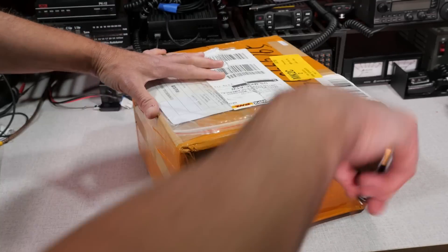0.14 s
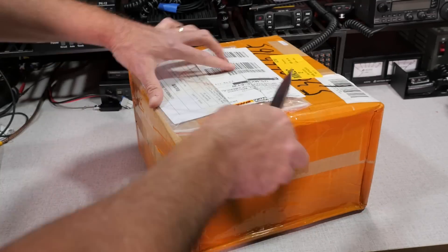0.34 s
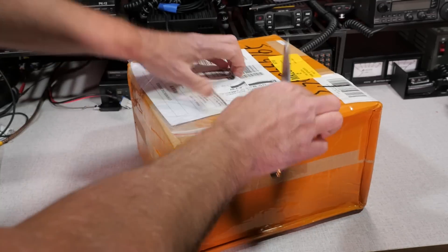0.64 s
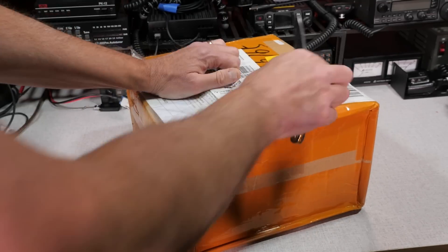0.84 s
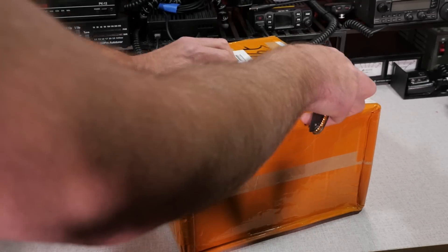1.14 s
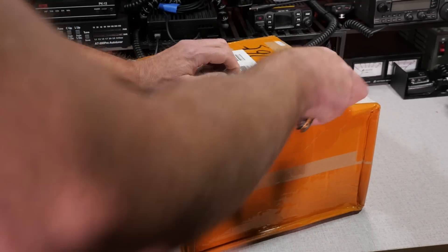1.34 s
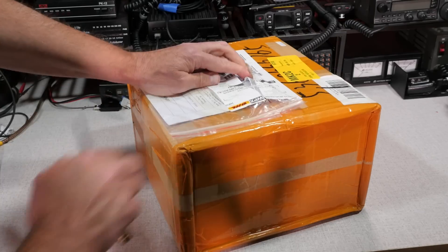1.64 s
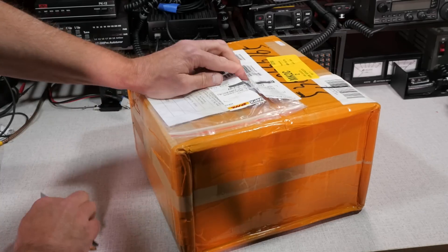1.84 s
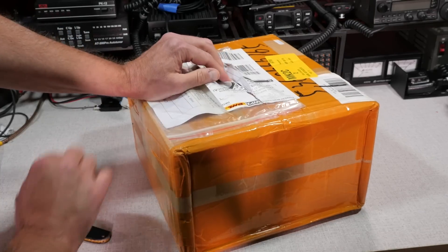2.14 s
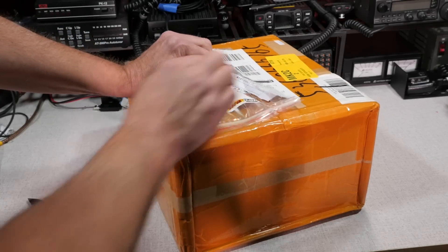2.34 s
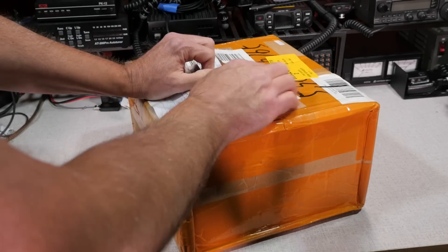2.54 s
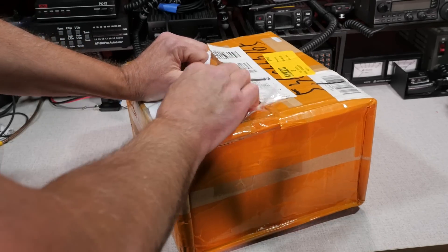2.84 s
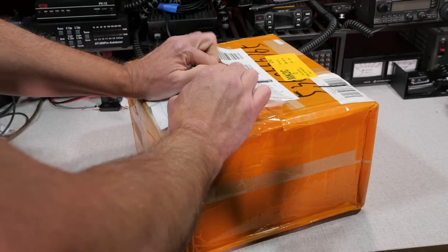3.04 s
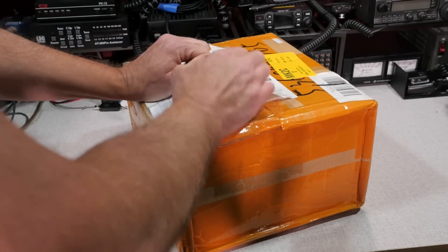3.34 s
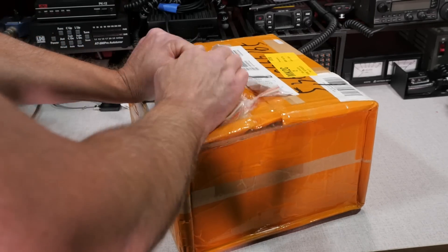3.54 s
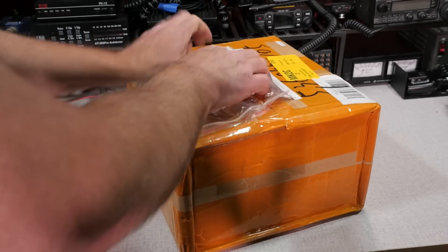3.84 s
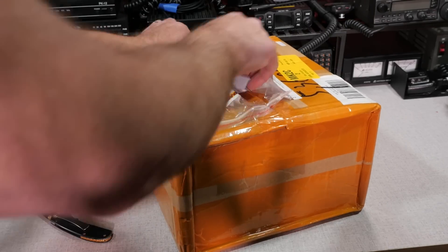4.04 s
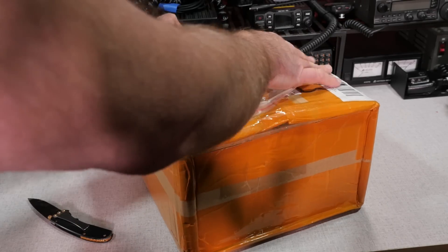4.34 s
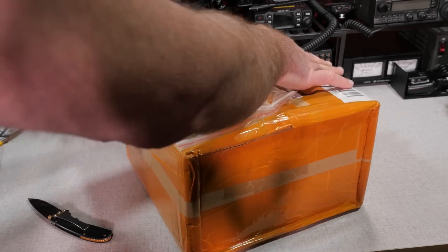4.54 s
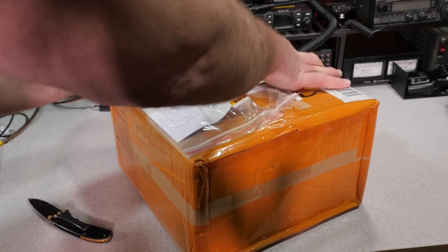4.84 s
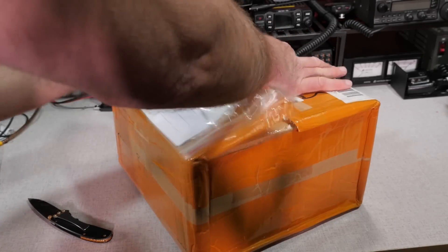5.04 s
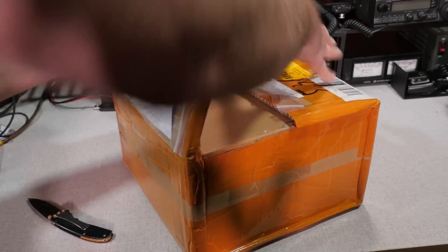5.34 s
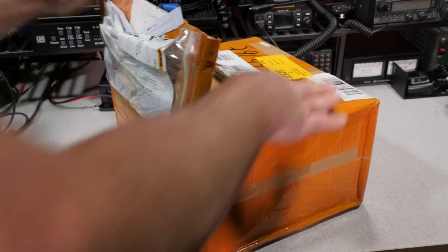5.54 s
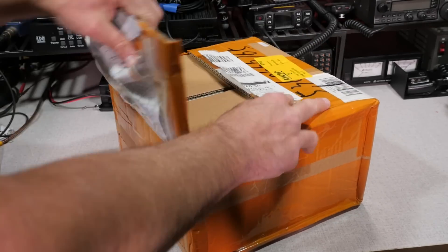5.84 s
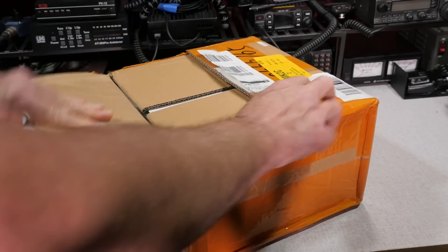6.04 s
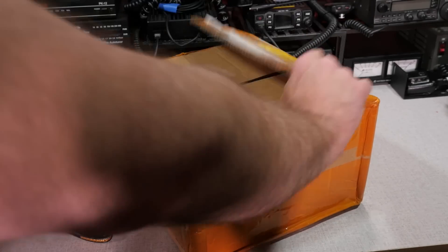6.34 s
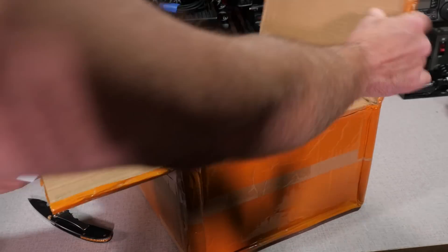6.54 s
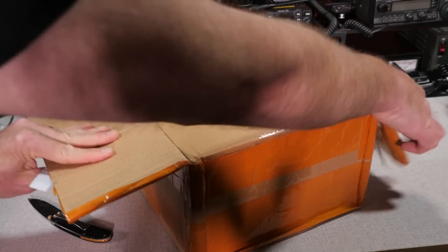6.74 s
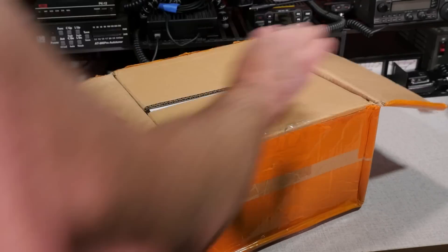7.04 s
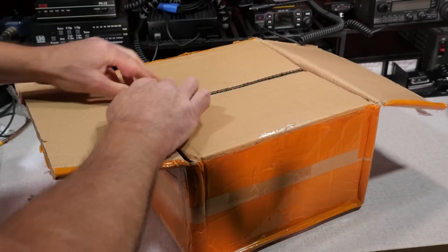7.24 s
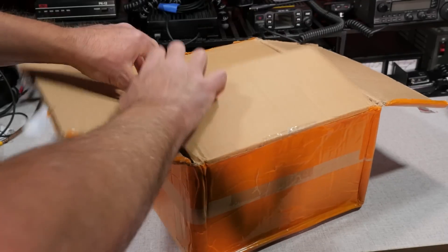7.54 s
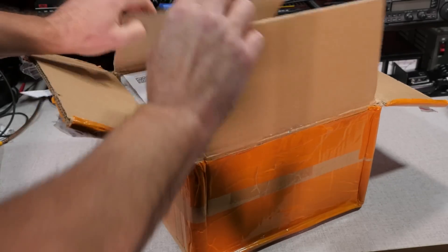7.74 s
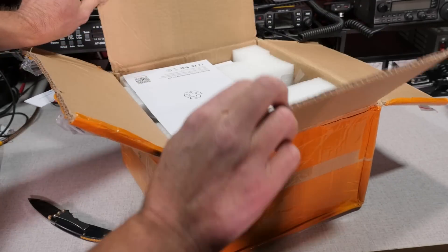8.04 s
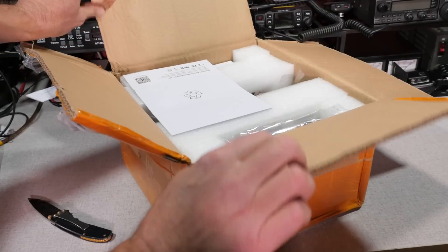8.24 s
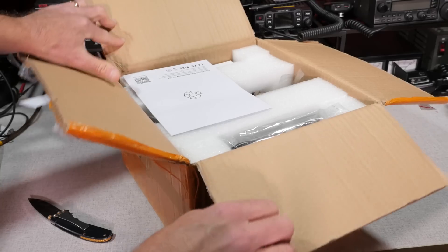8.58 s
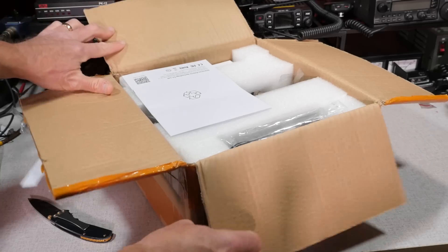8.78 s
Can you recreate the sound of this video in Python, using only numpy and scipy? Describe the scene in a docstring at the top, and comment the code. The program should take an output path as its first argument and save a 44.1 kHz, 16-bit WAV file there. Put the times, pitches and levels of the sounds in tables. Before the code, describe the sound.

A small, dry room with constant soft fan noise and faint wavering mains hum. At once, a sharp snap and hollow cardboard knock; around 0.8 s another crinkly crack with a box thud, then lighter film rustles and a knock at 1.6 s. At 2.1-2.3 s a short, coarse, drumming rip of the glued pouch. From 2.6 to 4 s plastic crinkles densely with bright tape snaps, the sharpest cluster near 3.5-3.6 s. Quieter crackles and ticks follow until about 4.9 s, when pressure builds into the loudest crack and hollow double thump at 5.05-5.1 s. Film rustle fades by 5.6 s and card flaps slide with a fine dry hiss. A sharp fold crack at 6.4 s, a tiny sagging creak at 6.7 s, soft scrapes, a bump at 7.5 s, then gentle flap slides to about 9 s.

```python
"""A small, dry room: a taped cardboard parcel is opened by hand on a desk, over equipment fans and a mains hum.
The plastic pouch on its lid rips and crinkles, tape snaps, the box knocks, and the flaps slide and crack at a fold.
Noise bursts make the snaps, random slips the friction and rip, damped sines the knocks, a sagging tone the creak.
Filters shape them as film, card and box; filtered noise and wavering sines make the equipment."""
import sys
import numpy as np
from scipy import signal
from scipy.fft import rfft, irfft
from scipy.io import wavfile
from scipy.ndimage import uniform_filter1d

SR = 44100
rng = np.random.default_rng(int(sys.argv[2]) if len(sys.argv) > 2 else 0)


def dump(signal):
    """Clip the signal to [-1, 1] and save it as 16-bit WAV at the path in sys.argv[1]."""
    limited = np.clip(np.atleast_2d(signal).T, -1, 1)
    pcm = np.round(limited * 32767).astype(np.int16)
    wavfile.write(sys.argv[1], SR, pcm)


N = 392921
TIME = np.arange(N) / SR
LEFT_RIGHT = np.array([[1], [-1]])


def undb(db):
    """Decibels to gain."""
    return 10 ** (np.asarray(db) / 20)


def unit(x):
    """Scale to rms 1."""
    return x / np.sqrt(np.mean(x ** 2))


def unit_peak(x, size=176):
    """Scale so that the loudest `size` samples have rms 1."""
    power = np.mean(np.atleast_2d(x) ** 2, axis=0)
    return x / np.sqrt(uniform_filter1d(power, size).max())


def add(out, sound, start_s):
    """Mix a sound in at a time."""
    start = max(int(start_s * SR), 0)
    out[..., start:start + sound.shape[-1]] += sound[..., :N - start]


def through(x, response):
    """Pass one or two channels through an impulse response."""
    return signal.oaconvolve(np.atleast_2d(x), np.atleast_2d(response), axes=1)[:, :x.shape[-1]]


def band(x, hz, kind, order=2):
    """Butterworth filter."""
    return signal.sosfilt(signal.butter(order, hz, kind, fs=SR, output="sos"), x)


def resonate(x, hz, q):
    """One resonance with gain 1 at its centre."""
    return signal.lfilter(*signal.iirpeak(hz, q, fs=SR), x)


def colour(points, size=512):
    """Causal (minimum-phase) impulse response with the given spectrum."""
    hz, db = np.transpose(points)
    bin_hz = np.maximum(np.arange(size // 2 + 1) * SR / size, 1)
    gain = undb(np.interp(np.log(bin_hz), np.log(hz), db))
    cepstrum = irfft(np.log(gain))
    cepstrum[1:size // 2] *= 2
    cepstrum[size // 2 + 1:] = 0
    return irfft(np.exp(rfft(cepstrum)))


def spread(mid, side, width, corner_hz=750):
    """Two channels that share the bass and differ in the treble."""
    return mid + width * band(side, corner_hz, "high") * LEFT_RIGHT


def walk(rate_hz):
    """Smooth random wandering with a spread near 1."""
    k = int(SR / rate_hz)
    steps = np.repeat(rng.standard_normal(N // k + 1), k)
    return 1.38 * uniform_filter1d(uniform_filter1d(steps, k), k)[:N]


def swell(start_s, rise_s, fade_s):
    """A straight rise, then an exponential fade."""
    t = TIME - start_s
    return np.clip(t / rise_s, 0, 1) * np.exp(-np.clip((t - rise_s) / fade_s, 0, 60))


def stroke(start_s, length_s, roundness):
    """A push that swells and dies away again; the rounder, the gentler its ends."""
    phase = (TIME - start_s) / length_s
    during, out = (phase > 0) & (phase < 1), np.zeros(N)
    out[during] = np.sin(np.pi * phase[during]) ** roundness
    return out


def grains(rate_hz, scatter_db, width):
    """Tiny slips at random moments and places, most weak and a few strong."""
    size = undb(scatter_db * np.minimum(rng.exponential(size=N), 4))
    slips = (rng.random(N) < rate_hz / SR) * size * rng.choice([-1, 1], N)
    return spread(slips, slips * rng.standard_normal(N), width)


# box resonances: (frequency [Hz], bandwidth [Hz], weight [dB])
BOX_MODES = [(159.4, 38, -3.5), (271.5, 32, -2), (374, 87, -1), (445, 81, 1), (600, 171, -1),
             (759, 88, -2.5), (843, 122, -3), (1035, 82, 1), (1063, 56, 1), (1270, 70, -8),
             (1830, 260, -3.5), (1917, 79, -0.5), (2340, 78, -1), (2540, 130, -5)]


def box_ring(lowest_hz=130, size=2048):
    """The box's answer to a tap: damped modes of alternating sign, kept above a lowest frequency."""
    t = np.arange(size) / SR
    out = np.zeros(size)
    for k, (hz, width_hz, db) in enumerate(BOX_MODES):
        decay = np.exp(-np.pi * width_hz * t)
        out += (-1) ** k * undb(db) * width_hz * decay * np.cos(2 * np.pi * hz * t)
    return band(out, lowest_hz, "high")


# fan spectrum: (frequency [Hz], level [dB])
FAN_SPECTRUM = [(25, -15), (45, -24), (75, -11.5), (110, -10.5), (170, 2.5), (300, 6.5), (550, 0.5),
                (900, -2), (1300, -6), (2200, -12.5), (4000, -17), (7800, -20.5), (11300, -13),
                (16000, -30)]
# mains and blade tones: (frequency [Hz], rms level before hum_db [dB])
HUM_TONES = [(118, -58), (237.8, -59), (812, -63), (880, -63.5), (698, -65.5), (974, -66), (1152, -66.5)]


def equipment(fan_db=-48, hum_db=-1, waver_db=1.5):
    """Steady fan noise with slightly wavering mains and blade tones."""
    noise = spread(*rng.standard_normal((2, N)), width=0.77)
    air = through(noise, colour(FAN_SPECTRUM, size=8192))
    tones = np.zeros(N)
    for hz, db in HUM_TONES:
        level = undb(db + waver_db * walk(3.46)) * np.sqrt(2)
        tones += level * np.sin(2 * np.pi * hz * TIME + 0.5 * walk(3.3))
    return undb(fan_db) * unit(air) + undb(hum_db) * tones


def room(x, t60_s=0.17, wet_db=-9.0, delay_s=0.005, size=16384):
    """Close walls and shelves give a short, dense tail of decaying noise."""
    t = np.arange(size) / SR
    diffuse = spread(*rng.standard_normal((2, size)), width=0.68)
    tail = diffuse * (t > delay_s) * np.exp(-np.log(1000) * t / t60_s)
    return x + undb(wet_db) * through(x, unit(tail) / np.sqrt(size))


CREAK_S, CREAK_LENGTH_S, CREAK_HZ, CREAK_DB, CREAK_SAG_HZ_PER_S = 6.736, 0.027, 468, -26, 700


def creak(overtone_db=-17):
    """A flap's fold sticks and slips: a short, nearly pure tone whose pitch sags as it lets go."""
    hz = CREAK_HZ - CREAK_SAG_HZ_PER_S * np.clip(TIME - CREAK_S, 0, CREAK_LENGTH_S)
    phase = 2 * np.pi * np.cumsum(hz * (1 + 0.0205 * walk(160))) / SR
    overtones = sum(np.sin(k * phase) / np.sqrt(k) for k in (2, 3, 4))
    tone = np.sin(phase) + undb(overtone_db) * overtones
    return unit(tone) * undb(CREAK_DB) * stroke(CREAK_S, CREAK_LENGTH_S, roundness=1.9)


# fingers and card edges on card: (middle [s], half length to 1/e [s], level [dB], pitch [Hz])
SCRAPES = [(1.976, .022, -40.5, 870), (1.978, 0.017, -41, 2870), (4.959, 0.021, -28.5, 2260),
           (5.364, 0.014, -40, 1620), (5.66, 0.022, -39, 9000), (5.843, 0.02, -30.5, 2070),
           (6.321, 0.034, -39.5, 930), (6.337, 0.011, -32, 10200), (6.759, 0.0067, -40, 1490),
           (7.035, 0.028, -45.5, 630), (7.217, 0.013, -38.5, 510), (7.712, 0.034, -43.5, 1320)]


def scrapes(q=1.07):
    """An edge judders across card, swelling and fading in one broad resonance."""
    slips = grains(rate_hz=900, scatter_db=1.5, width=0.52)
    out = np.zeros((2, N))
    for middle_s, half_s, db, hz in SCRAPES:
        near = np.abs(TIME - middle_s) < 3 * half_s
        press = np.exp(-((TIME[near] - middle_s) / half_s) ** 2)
        rasp = resonate(resonate(slips[:, near], hz, q), hz, q)
        out[:, near] += undb(db) * press * unit(rasp)
    return out


def wall_swing(hz, t60_s, rise_s=0.00098, size=8192):
    """A cardboard panel swings for a few cycles."""
    t = np.arange(size) / SR
    envelope = (1 - np.exp(-t / rise_s)) * np.exp(-np.log(1000) * t / t60_s)
    return unit_peak(np.sin(2 * np.pi * hz * t) * envelope)


# blows on the walls: (time [s], wall level [dB], wall pitch [Hz], t60 [s], box body above wall [dB])
KNOCKS = [(0.053, -17, 566, 0.081, 2.5), (0.657, -42, 290, 0.071, 7.5), (0.736, -27.5, 324, 0.035, -8),
          (0.804, -18, 305, .06, -2), (1.01, -37.5, 362, 0.12, 4), (1.229, -33.5, 292, 0.05, -7),
          (1.645, -32.5, 263, 0.075, 0.5), (2.31, -38, 403, .11, 6), (2.758, -36, 560, .044, -4),
          (2.993, -38, 640, 0.072, -6), (3.576, -33, 438, .06, 6), (4.524, -43, 376, .06, 3),
          (4.623, -40.5, 406, 0.055, 3), (4.95, -38.5, 650, 0.053, 6), (5.056, -26, 685, 0.04, -1),
          (5.087, -12, 694, 0.039, -12), (5.096, -8, 395, 0.022, -10), (5.526, -37, 350, .044, 0.5),
          (5.96, -39.5, 370, 0.048, 6), (6.372, -26.5, 637, 0.028, -3.5), (7.306, -39.5, 366, .07, -4),
          (7.4, -41, 340, .12, 4), (7.461, -39, 420, 0.046, 0), (7.541, -26, 626, 0.04, -1.5)]
# box bumps on the desk: (time [s], level [dB])
THUDS = [(0.056, -40), (0.811, -29), (4.983, -30), (5.096, -19), (6.999, -39), (7.543, -28)]


def knocks(soft_hz=520, lowest_hz=130, thud_hz=180, thud_t60_s=0.031, contact_s=0.003, size=8192):
    """The struck wall swings and sets the rest of the box going; now and then its base thuds on the desk."""
    out, t = np.zeros((2, N)), np.arange(size) / SR
    body = band(box_ring(), soft_hz, "low", order=3)
    for s, db, hz, t60_s, body_db in KNOCKS:
        blow = rng.standard_normal(size) * np.exp(-t / contact_s)
        rest = unit_peak(through(blow, body))
        add(out, undb(db) * (wall_swing(hz, t60_s) + undb(body_db) * rest), s)
    for s, db in THUDS:
        add(out, undb(db) * wall_swing(thud_hz, thud_t60_s), s)
    return band(out, lowest_hz, "high", order=3)


# crack of snaps, friction, buckling facets and ripping pouch: (frequency [Hz], level [dB])
CRACK_SPECTRUM = [(600, -26), (1200, 7.5), (1800, 5.5), (3300, 7), (4800, 4.5), (6500, 5.5), (10000, -20)]


def friction(crinkle, hiss, drag, hiss_spectrum, coarse):
    """Sparse creases (power share `coarse`) and fine fibres crinkle, hiss and shake the box, pressed unsteadily."""
    coarse = np.clip(coarse, 0, 1)
    creases = unit(grains(rate_hz=380, scatter_db=4.8, width=0.3))
    pressure = undb(2.7 * walk(60))
    box = band(box_ring(), 670, "low")
    parts = (colour(CRACK_SPECTRUM), crinkle), (colour(hiss_spectrum), hiss), (box, drag)
    out = 0
    for response, gain in parts:
        fibres = unit(grains(rate_hz=12000, scatter_db=3, width=0.51))
        slips = (np.sqrt(coarse) * creases + np.sqrt(1 - coarse) * fibres) * pressure
        out = out + gain * unit(through(slips, response))
    return out


# card-on-card hiss: (frequency [Hz], level [dB])
CARD_HISS_SPECTRUM = [(2000, -22), (4500, -2.5), (7000, 1), (8000, -1), (9300, 5.5), (11500, 7),
                      (13500, 1.5), (15000, -2), (16000, -18)]
# flap pushes: (start [s], length [s], push level [dB], box drag above push before drag_db [dB])
SLIDES = [(5.58, 0.46, -39.5, -9), (5.984, 0.26, -46.5, -14), (6.271, 0.16, -40.5, -8),
          (6.41, 0.16, -43, -2), (6.559, 0.23, -38.5, -8), (6.807, 0.053, -38, -1), (6.928, 0.12, -40, -3),
          (7.06, 0.44, -44, -8), (7.158, 0.14, -49, -29), (7.36, 0.1, -51, 6), (7.502, 0.16, -50, 5.5),
          (7.661, .13, -42, -3), (7.818, 0.19, -45, -7), (7.998, 0.12, -50.5, -2), (8.202, 0.26, -45, -13),
          (8.415, 0.28, -44, -6.5), (8.713, 0.26, -48, -3)]


def flaps(roundness=0.51, rasp_db=-9, hiss_db=0, drag_db=-2):
    """Bare card flaps slide over each other with a fine, smooth hiss that swells and fades with each push."""
    force, drag = np.zeros((2, N))
    for s, length_s, db, drag_above_db in SLIDES:
        push = undb(db) * stroke(s, length_s, roundness)
        force, drag = force + push, drag + undb(drag_above_db) * push
    rasp, hiss = undb(rasp_db) * force, undb(hiss_db) * force
    return friction(rasp, hiss, undb(drag_db) * drag, CARD_HISS_SPECTRUM, coarse=0.07)


# film sizzle of the snaps, the buckling facets and the ripping pouch: (frequency [Hz], level [dB])
SIZZLE_SPECTRUM = [(2500, -49.5), (5000, -8), (7000, -4), (7900, -4), (9500, 1), (11500, 0.5),
                   (14000, -6.5), (16000, -16.5)]


def buckles(force, per_s=32, above_db=5, scatter_db=4, low_hz=1100, high_hz=5500, fade_s=0.0026, q=3, size=1024):
    """Small facets of the film pop over at random, each with its own pitch, louder the harder the fingers press."""
    out, t = np.zeros((2, N)), np.arange(size) / SR
    noise = spread(*rng.standard_normal((2, N)), width=0.72)
    noise = through(noise, colour(CRACK_SPECTRUM) + colour(SIZZLE_SPECTRUM))
    facets = 1000
    for when, pitch, strength, chance in rng.random((facets, 4)):
        at = int(when * (N - size))
        if chance < per_s * N / SR / facets:
            burst = noise[:, at:at + size] * np.exp(-t / fade_s)
            pop = resonate(burst, low_hz * (high_hz / low_hz) ** pitch, q)
            gain = undb(above_db + scatter_db * (2 * strength - 2.5))
            add(out, unit_peak(pop) * force[at] * gain, at / SR)
    return out


# film hiss: (frequency [Hz], level [dB])
FILM_HISS_SPECTRUM = [(2000, -27.5), (4500, 1), (7000, 6), (7900, 2.5), (9000, 7), (11000, 8), (13000, 2.5),
                      (15000, 0), (16000, -25)]
# fingers bunching film: (start [s], length [s], grip level [dB], box drag above grip before drag_db [dB])
CRUMPLES = [(0.0, 0.11, -49, 4), (0.234, 0.084, -53, 11), (0.635, 0.18, -49.5, 3), (0.756, 0.12, -38.5, 1),
            (0.949, 0.17, -47.5, 2), (1.129, 0.15, -55, 1), (1.36, .18, -60.5, 0), (1.607, 0.097, -47.5, 4),
            (1.77, 0.14, -63, 0), (1.92, 0.084, -48.5, 7), (2.029, 0.2, -46, 0), (2.34, 0.12, -55, 7),
            (2.525, 0.2, -55, 1), (2.628, 0.15, -46, -11), (2.74, 0.22, -46.5, -22),
            (2.933, 0.23, -43.5, -1.5), (3.268, 0.098, -37, -4.5), (3.4, 0.3, -44.5, -11),
            (3.761, 0.17, -38.5, -10.5), (3.966, 0.18, -49, -7), (4.131, 0.12, -42.5, -4),
            (4.299, .11, -49, 2), (4.479, 0.13, -47.5, -2.5), (4.612, 0.058, -40.5, -3.5),
            (4.714, 0.22, -46.5, 0), (4.925, 0.23, -34, -2), (5.153, 0.19, -47.5, 7.5),
            (5.311, 0.09, -43.5, 5), (5.439, 0.066, -54, -2), (5.507, 0.066, -43.5, -0.5)]


def film(attack_s=0.005, release_s=0.021, arch_db=4.5, crinkle_db=0, hiss_db=0, drag_db=-2, resting_db=-73):
    """Fingers grip, press hardest halfway and let go; the film crinkles in sparse grains and ticks faintly at rest."""
    force, drag = np.full(N, undb(resting_db)), np.zeros(N)
    for s, length_s, db, drag_above_db in CRUMPLES:
        t = np.arange(int((length_s + 6 * release_s) * SR)) / SR
        arch = undb(arch_db * (np.sin(np.pi * np.minimum(t / length_s, 1)) - 1))
        let_go = np.exp(-np.maximum(t - length_s, 0) / release_s)
        grip = arch * np.minimum(t / attack_s, 1) * let_go
        add(force, undb(db) * grip, s)
        add(drag, undb(db + drag_above_db) * grip, s)
    crinkle, hiss = undb(crinkle_db) * force, undb(hiss_db) * force
    rubbing = friction(crinkle, hiss, undb(drag_db) * drag, FILM_HISS_SPECTRUM, coarse=0.46)
    return rubbing + buckles(force)


# tugs on the pouch: (start [s], pull level [dB], film sizzle above pull [dB])
TUGS = [(2.086, -21.5, -14), (2.107, -14.5, -5), (2.147, -19.5, -8), (2.176, -19.5, -26), (2.222, -23, -6),
        (2.251, -30, -8.5)]
TUG_RISE_S, TUG_FADE_S = 0.013, 0.026


def rip(lowest_hz=190, highest_hz=1900, drum_hz=950, drum_db=1, crack_db=1):
    """Tugged glue lets go in dense slips that shake the lid, drum in the taut pouch and crackle in its film."""
    pull, sizzle = np.zeros((2, N))
    for s, db, sizzle_db in TUGS:
        tug = undb(db) * swell(s, TUG_RISE_S, TUG_FADE_S)
        pull, sizzle = np.hypot(pull, tug), np.hypot(sizzle, undb(sizzle_db) * tug)
    slips = grains(rate_hz=1300, scatter_db=1.5, width=0.51)
    lid = unit(band(through(slips, box_ring()), [lowest_hz, highest_hz], "band"))
    drum = unit(resonate(slips, drum_hz, q=3))
    crackle = unit(through(slips, colour(CRACK_SPECTRUM)))
    pouch_film = unit(through(slips, colour(SIZZLE_SPECTRUM))) + undb(crack_db) * crackle
    return band(pull * (lid + undb(drum_db) * drum) + sizzle * pouch_film, 124, "high")


# tape, film and card snapping; part levels are before crack_db, card_db and film_db:
# (time [s], crack level [dB], card ring above crack [dB], film sizzle above crack [dB],
#  sheet pitch [Hz], flutter drive above release [dB])
SNAPS = [(0.0532, -15.5, -3.5, -10, 1840, 3), (0.0573, -15, -27, 4, 2450, -13),
         (0.281, -35, -24, 9, 2960, -6), (0.3322, -38.5, -2, -9, 1850, 21),
         (0.553, -64, -10, 18.5, 4000, -1), (0.654, -47, -8, 12.5, 1500, -12.5),
         (0.7852, -33.5, 1, 1, 2110, 1), (0.8057, -26.5, -25, 1, 1370, -13),
         (0.834, -23.5, -7, 8.5, 4650, -21.5), (0.9105, -25, -9, -2.5, 3320, -17),
         (1.026, -36, -24, -9, 1450, -10), (1.402, -50, 3, 11.5, 3050, -1), (1.6469, -27, -13, 0, 2200, 10),
         (2.046, -42, -9, 3, 4360, -6), (2.075, -31, -10, -5, 5500, -3), (2.093, -21, -15, -1.5, 2340, -2),
         (2.1814, -15.5, 5.5, 1, 1770, -9.5), (2.349, -42.5, -13, 8.5, 3770, -10),
         (2.6675, -26, -12, 5.5, 5400, -12), (2.691, -33.5, -24, 2.5, 4270, -19),
         (2.7513, -34, -4, 17.5, 4900, -13), (2.7634, -21.5, -15, 6, 4000, -12),
         (2.795, -18, -12.5, 6, 3820, -11.5), (2.854, -32.5, -25, 6, 5000, -9),
         (2.933, -31.5, -6, -1.5, 4100, 6), (3.0935, -33.5, -2, 1, 1200, -4),
         (3.105, -27, -24, -2, 1090, -4), (3.2251, -24, -13.5, -2.5, 3040, -10),
         (3.3564, -41, -3.5, 11, 4340, -4), (3.472, -25.5, -7.5, 9, 4000, -9),
         (3.4901, -24.5, -6, 10, 4960, 4), (3.5194, -19, -6, 5.5, 5070, -18),
         (3.5276, -18.5, -26, 3.5, 3950, 5), (3.5642, -8.5, -26, -2.5, 3600, -17.5),
         (3.579, -13.5, -17, -9, 1200, -21), (3.5963, -18, -15, -2.5, 3480, -12),
         (3.7471, -39.5, -10, 12, 4700, -9), (3.8953, -34.5, -11, 2.5, 1440, -8),
         (4.0177, -41, -3, -14, 1220, 8), (4.0809, -36.5, -17, 2, 2980, -10),
         (4.2042, -29, -10, -4, 4580, -5), (4.377, -35.5, -19, -7, 1240, 7),
         (4.4881, -39.5, 7, 0, 1290, -10), (4.5158, -37.5, 0, -9, 1260, -9),
         (4.5526, -31, -9, -14, 1970, 2), (4.6256, -38.5, 2, 3.5, 2900, -12),
         (4.775, -34, -26, -7, 1670, -11), (4.812, -34, -21, -2, 4000, -19),
         (4.9521, -24.5, -3, -3, 2300, -7), (4.9796, -23.5, -4.5, 0.5, 2290, -12),
         (5.053, -18.5, -10, -11, 2270, -4), (5.0595, -13, -2.5, -5.5, 1930, -16),
         (5.0868, -18.5, 5, -3, 1360, 7), (5.0961, -12.5, -13, -1, 3030, -15.5),
         (5.257, -29.5, -24, 3.5, 1510, -9), (5.5213, -30.5, -6, 5, 1810, 1),
         (5.8201, -32.5, -11, 1, 2030, -16), (5.8397, -24.5, -9, 3, 2790, -12),
         (6.3735, -13, -19, -4, 1360, 17), (6.4626, -27, -9.5, -1, 5400, 8),
         (6.7151, -53, -15, 12, 1430, -1), (6.8148, -35, -9, -5, 1620, -11),
         (6.941, -44.5, -12, 8.5, 1730, -7), (7.5392, -31.5, -12, -2, 1230, 7),
         (7.859, -35, -29, 2, 2520, -8), (8.2493, -42, 1, 11, 1140, -2), (8.7156, -40.5, -13, 5, 3320, -15)]


def snaps(flutter_s=0.011, desk_s=0.004, desk_db=-5, strain_s=0.0019, strain_db=-13, sheet_db=4,
          crack_db=-1, card_db=-2, film_db=-1, lead_s=0.008, crack_s=0.00045, sheet_q=3.5, size=4096):
    """A sheet strains, lets go with a crack that bounces off the desk, and flutters; the box rings along."""
    out, t = np.zeros((2, N)), np.arange(size) / SR - lead_s
    crack, sizzle = colour(CRACK_SPECTRUM), colour(SIZZLE_SPECTRUM)
    card = band(box_ring(), [520, 1600], "band")
    strain = undb(strain_db) * (t <= 0) * np.exp(-np.abs(t) / strain_s)
    release = (t > 0) * np.exp(-np.abs(t) / crack_s)
    bounce = undb(desk_db) * (t > desk_s) * np.exp(-np.abs(t - desk_s) / crack_s)
    for s, db, ring_db, sizzle_db, hz, flutter_db in SNAPS:
        tick, mid, side = rng.standard_normal((3, size))
        flutter = undb(flutter_db) * (t > 0) * np.exp(-np.abs(t) / flutter_s)
        push = tick * (strain + release + bounce) + flutter * spread(mid, side, width=0.55)
        sheet = crack + undb(sheet_db) * resonate(crack, hz, sheet_q)
        parts = (sheet, crack_db), (card, card_db + ring_db), (sizzle, film_db + sizzle_db)
        sound = sum(undb(part_db) * unit_peak(through(push, response)) for response, part_db in parts)
        add(out, sound * undb(db), s - lead_s)
    return out


# where the hands work: (time [s], left minus right [dB])
HAND_PLACE = [(0, 0), (2.4, 0), (5.35, 0), (5.55, 2), (5.9, 1.5), (6.35, -0.5), (6.85, -1.5), (7.2, 2),
              (7.6, 0.5), (8.2, 2.5), (8.9, 1.5)]


def scene(lowest_hz=105):
    """Everything the parcel does, without deep bass, heard in the room over the equipment."""
    place_s, place_db = np.transpose(HAND_PLACE)
    pan_db = np.interp(TIME, place_s, place_db)
    handling = (snaps() + film() + flaps()) * undb(pan_db * LEFT_RIGHT / 2)
    parcel = handling + knocks() + rip() + scrapes() + creak()
    return room(band(parcel, lowest_hz, "high", order=4)) + equipment()


def gain_control(x, threshold_db=-12, slope=0.23, release_db_per_s=25, attack_s=0.0043):
    """Loud peaks turn the gain down; it creeps back as the held peak level falls at the release rate."""
    recovery_db = release_db_per_s * TIME
    peak_db = 20 * np.log10(np.abs(x).max(axis=0) + 1e-9)
    held_db = np.maximum.accumulate(peak_db + recovery_db) - recovery_db
    pole = np.exp(-1 / (attack_s * SR))
    excess_db = signal.lfilter([1 - pole], [1, -pole], np.maximum(held_db - threshold_db, 0))
    return x * undb(-slope * excess_db)


def record(dry, ceiling=0.8, top_hz=16000):
    """The recorder ducks after loud cracks, rounds the highest peaks and cuts the top."""
    rounded = ceiling * np.tanh(gain_control(dry) / ceiling)
    return signal.sosfilt(signal.ellip(8, 0.2, 70, top_hz, fs=SR, output="sos"), rounded)


dry = scene()
out = record(dry)
dump(out)
```